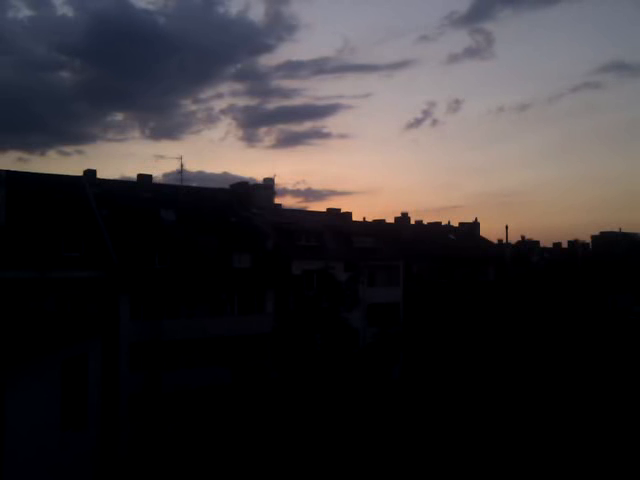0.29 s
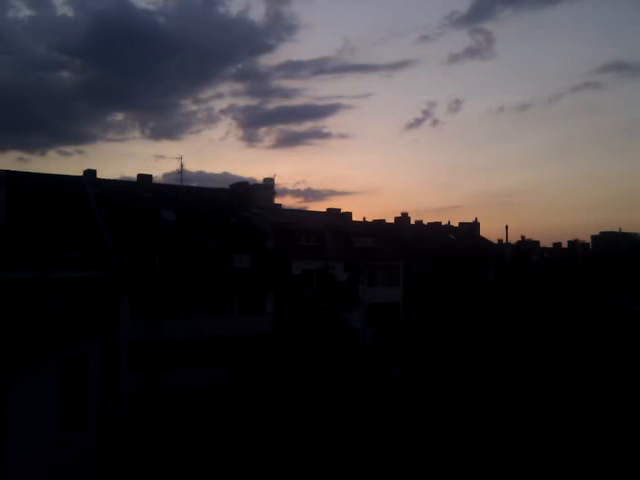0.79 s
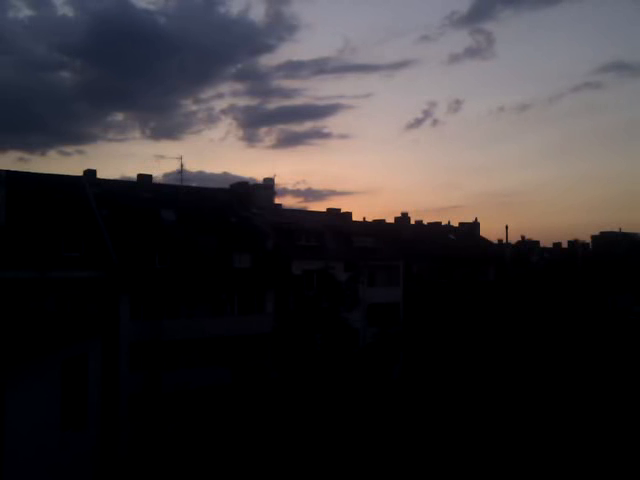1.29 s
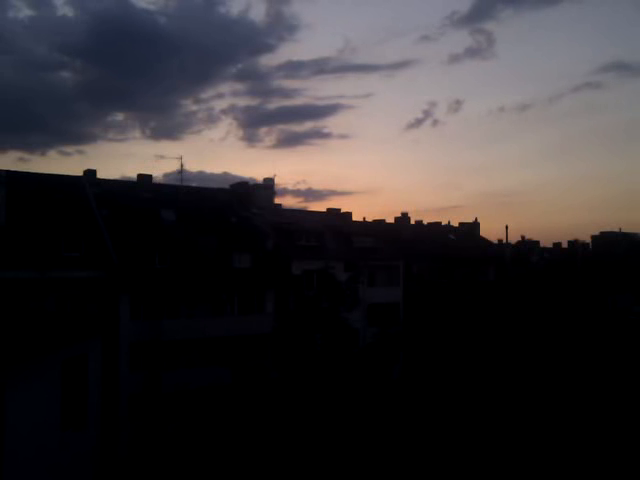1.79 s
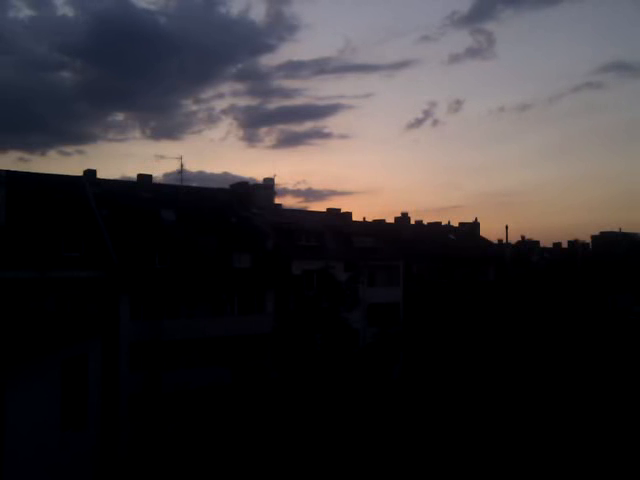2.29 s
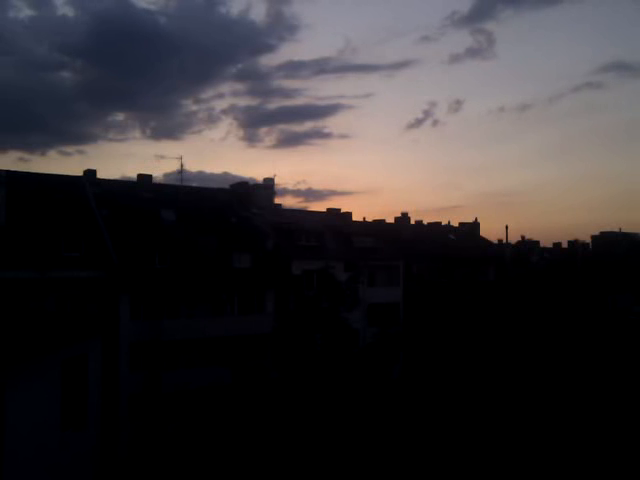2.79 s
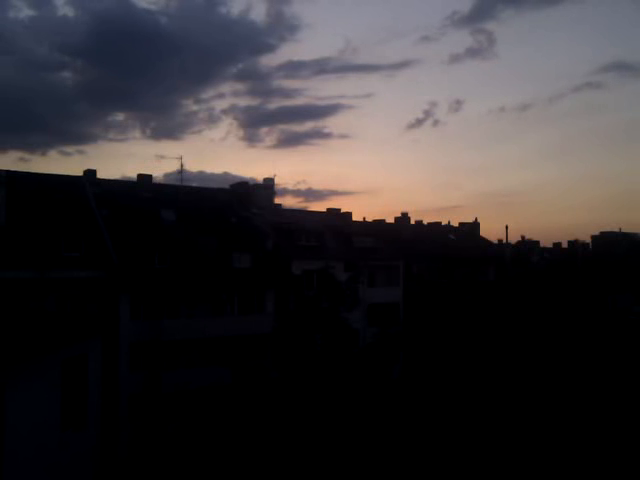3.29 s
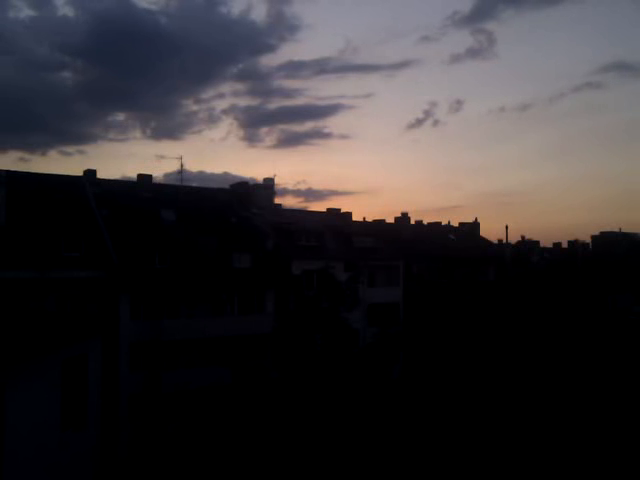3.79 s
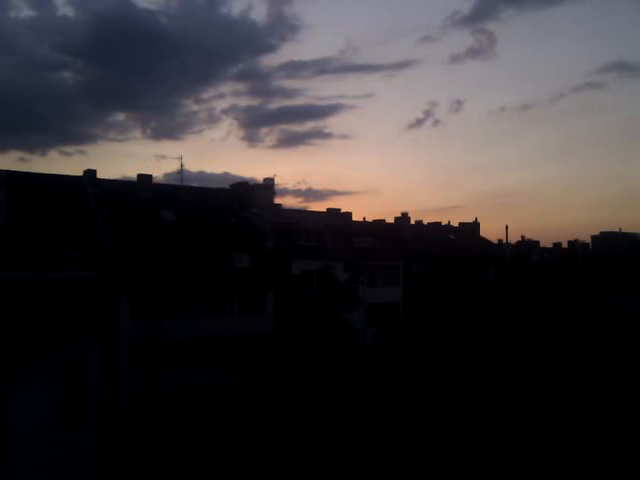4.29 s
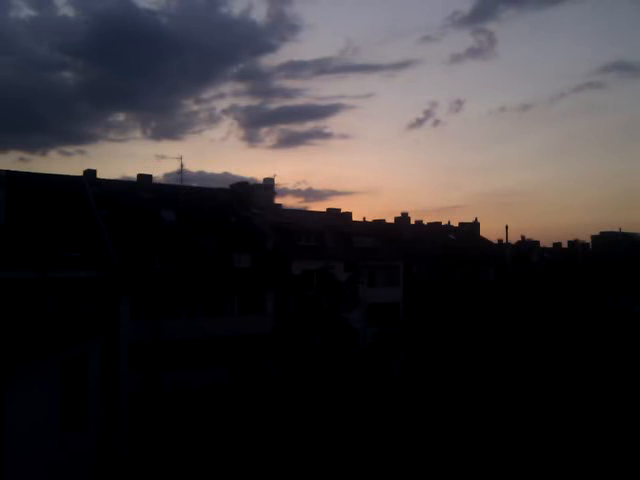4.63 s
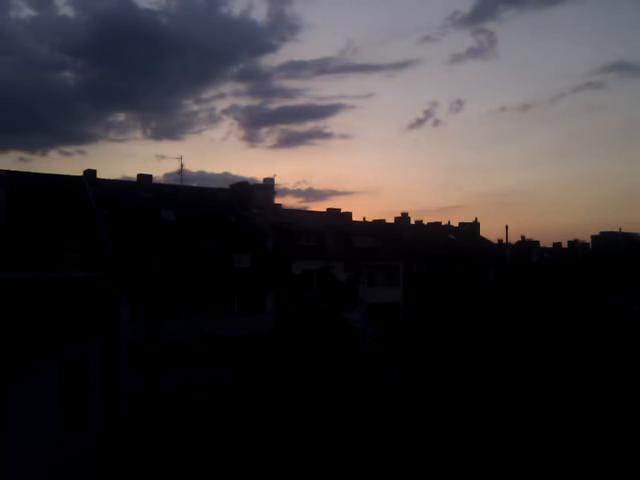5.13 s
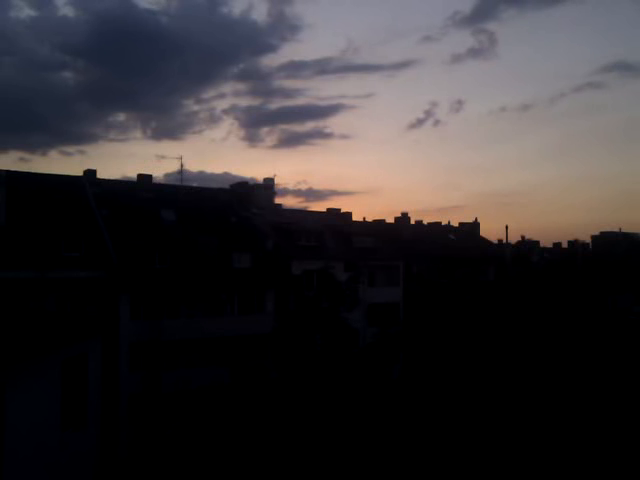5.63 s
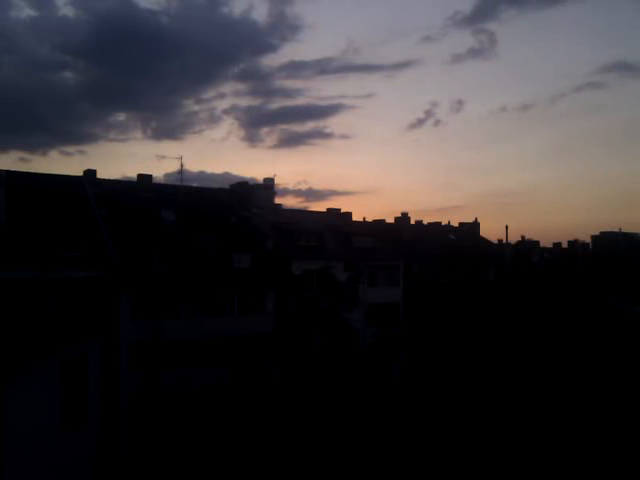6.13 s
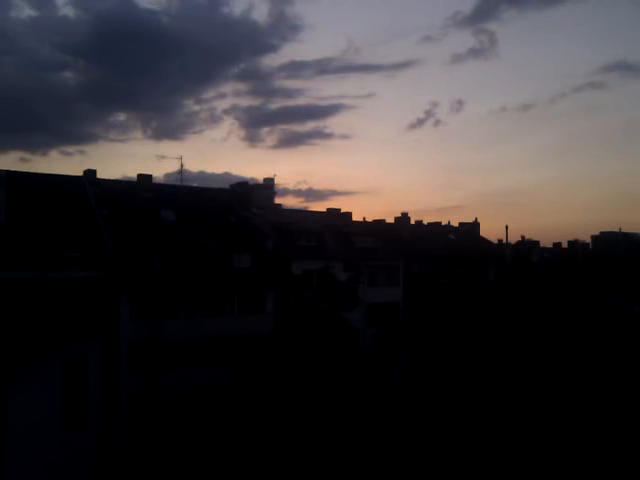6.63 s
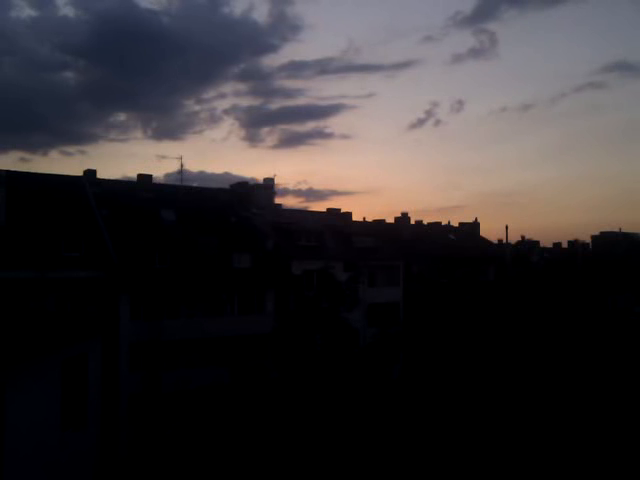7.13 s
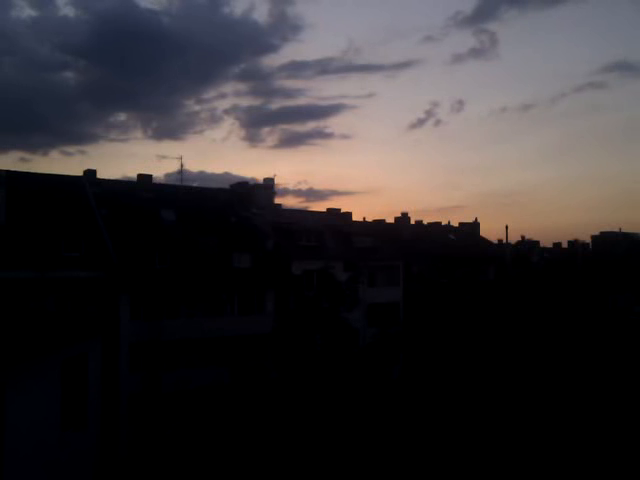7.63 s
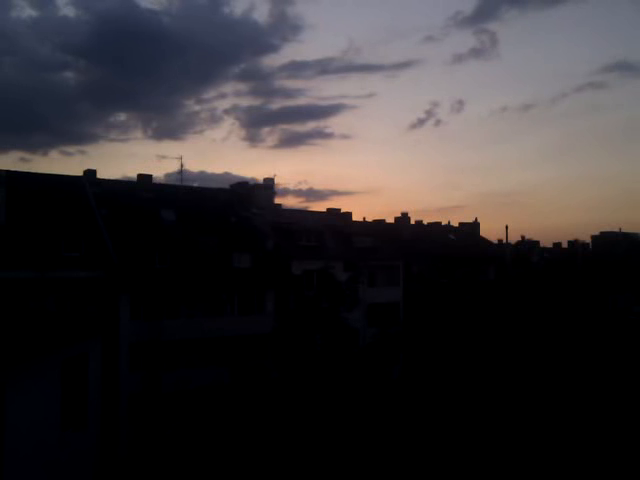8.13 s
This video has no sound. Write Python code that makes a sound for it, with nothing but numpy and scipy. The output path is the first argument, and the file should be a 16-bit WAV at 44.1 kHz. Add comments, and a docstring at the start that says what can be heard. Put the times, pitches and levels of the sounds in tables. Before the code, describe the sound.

A blackbird sings a short phrase of fluted notes and buzzy trills over city rooftops, mixed with dry twitters and thin swift screams. The swifts call faintly, then grow loud and shrill around the middle as the blackbird sings again, ending in quick chips. The screams then recede. Calls echo off the houses, and a low murmur of traffic and distant engines continues underneath, heard from a fixed outdoor position.

```python
"""Blackbird and swifts at dusk

A blackbird sings over the roofs: low fluted notes, buzzy trills and quick chips, its two-sided
syrinx often sounding two notes at once. Swifts scream overhead, near and far, among dry twitters.
House fronts throw the sound back. Underneath sit a city murmur, droning engines and one soft rustle."""
import sys
import numpy as np
from scipy import signal
from scipy.fft import rfft, irfft, next_fast_len
from scipy.io import wavfile
from scipy.ndimage import uniform_filter1d

SR = 44100
rng = np.random.default_rng(int(sys.argv[2]) if len(sys.argv) > 2 else 0)


def generate_wav(sig):
    """Save sig (samples, or channels by samples) to the path in sys.argv[1] as 16-bit PCM at SR."""
    pcm = np.round(np.clip(np.atleast_2d(sig).T, -1, 1) * 32767).astype(np.int16)
    wavfile.write(sys.argv[1], SR, pcm)


N = 369558

# The blackbird's smooth notes. Here and below, peak_at runs from 0 (a sound's start) to 1 (its end).
# start_s, length_s, opening_hz, middle_hz, closing_hz, level_db, peak_at
WHISTLES = [ (0.206, 0.1, 1930, 1737, 1718, -41, 0.1), (0.315, 0.044, 2215, 2130, 2160, -40, 0.5),
            (0.358, 0.033, 2130, 2173, 2160, -29.5, 0.5), (0.393, 0.044, 2227, 2257, 2240, -29.5, 0.2),
            (0.623, 0.054, 2467, 2380, 2260, -32, 0.4), (1.209, 0.07, 2900, 3280, 3520, -40, 0.66),
            (1.246, 0.028, 6760, 6950, 7120, -49, 0.8), (1.288, 0.0099, 3100, 4470, 5250, -38, 0.5),
            (1.296, 0.021, 5150, 5720, 5850, -43, 0.1), (1.393, 0.048, 3110, 3325, 3420, -41.5, 0.68),
            (1.403, 0.022, 6530, 6760, 6900, -49, 0.7), (1.458, 0.025, 3360, 5400, 5760, -48.5, 0),
            (4.405, 0.048, 2265, 2320, 2440, -43, 0.95), (4.443, 0.014, 2400, 2700, 3020, -40.5, 0.8),
            (4.493, 0.04, 2150, 2083, 2033, -42, 0.7), (4.859, 0.087, 3240, 2940, 2780, -33, 1),
            (4.954, 0.014, 1860, 2034, 2160, -41.5, 0.8), (4.967, 0.066, 2170, 2217, 2262, -32.5, 0.16),
            (5.184, 0.023, 1720, 1948, 2030, -41, 0.85), (5.199, 0.077, 2035, 1938, 1803, -33.5, 0.36),
            (5.655, 0.057, 2545, 2517, 2488, -35.5, 0.48), (5.71, 0.075, 2400, 2420, 2388, -28.5, 0.21),
            (5.797, 0.033, 2295, 2254, 2260, -32.5, 0.6), (5.833, 0.067, 2235, 2168, 2203, -32, 0.18),
            (6.180, 0.025, 4050, 3860, 3780, -36, 0.58), (6.192, 0.031, 7600, 6930, 3670, -33.5, 0.52),
            (6.205, 0.02, 3710, 3140, 2660, -38.5, 0), (6.697, 0.031, 4410, 5390, 7570, -42, 0.9),
            (6.717, 0.017, 2680, 3360, 4740, -46, 0.65), (6.734, 0.037, 4600, 5360, 5300, -48.5, 0.3),
            (6.788, .008, 5870, 6700, 7550, -44, 0.4), (6.957, 0.01, 7700, 6800, 6100, -33.5, 0.47),
            (6.965, 0.015, 6270, 5680, 5400, -38.5, 0.3), ]
# Its trilled notes:
# start_s, length_s, opening_hz, middle_hz, closing_hz, level_db, peak_at, beat_hz, swing_hz, pulsing_db
TRILLS = [ (0, 0.125, 2108, 2114, 2170, -51, 0, 58, 45, 3.5),
          (0.135, 0.08, 2453, 2405, 2395, -45.5, 0.6, 44, 430, 3.5),
          (0.497, 0.092, 2372, 2490, 2630, -44, 0.85, 48, 422, 1.5),
          (0.532, 0.09, 2242, 2255, 2253, -43, 0.66, 98, 130, 3),
          (0.593, 0.033, 2900, 2740, 2560, -38, 0.5, 53, 125.6, 3),
          (4.458, 0.035, 2316, 2270, 2230, -48, 0.2, 97, 326, 0),
          (4.637, 0.18, 2367, 2312, 2096, -39.5, 0.66, 87, 110, 1.5),
          (5.265, 0.24, 1842, 1790, 1856, -40, 0.11, 29.6, 45, 13),
          (5.491, 0.14, 1980, 2334, 2400, -34, 0.78, 61, 37.5, 4.5),
          (6.23, 0.072, 3565, 3900, 3440, -37.5, 0.53, 122, 380, 1.5), ]
# Its run of quick chips: time_s, level_db
CHIPS = [(6.397, -42), (6.421, -36), (6.445, -38), (6.470, -38.5), (6.494, -37), (6.517, -37.5),
         (6.541, -40), (6.563, -40)]
# The flick and drop of one chip: offset_s, pitch_hz, gain_db
CHIP_SHAPE = [(-.011, 6200, -12), (-.005, 6500, 0), (-.002, 6600, -1), (0, 7500, -2), (.002, 6000, -7),
              (.005, 4500, -18)]
# Swift screams; rasp runs from 0 (clean) to 1 (hoarse).
# start_s, length_s, scoop_s, opening_hz, middle_hz, closing_hz, level_db, peak_at, rasp
SCREAMS = [ (-.02, 0.052, 0.0038, 5300, 5380, 5420, -48.5, 0.4, 0.57),
           (0.027, 0.31, 0, 6200, 6660, 6230, -43, 0.42, 0.82),
           (0.194, 0.16, 0.0046, 5730, 5520, 5460, -43.5, 0.23, 0.96),
           (.338, 0.12, 0, 5290, 5020, 4650, -45.5, 0.05, 0.99),
           (1.542, 0.14, 0.0027, 5810, 6000, 6100, -57, 0.35, 0.5),
           (1.656, 0.32, 0, 6170, 6230, 6230, -56.5, 0.3, 0.5),
           (1.907, 0.19, 0.0039, 5890, 5950, 5950, -54, 0.4, 0.15),
           (2.155, 0.45, 0.0054, 5980, 6090, 5980, -54, 0.7, 0.54),
           (2.598, 0.31, 0.0061, 6040, 5920, 6100, -55, 0.6, 0.73),
           (2.787, .13, 0.031, 6030, 5920, 6080, -39.5, 0.32, 0.37),
           (2.841, 0.2, 0.031, 6020, 6120, 6190, -36, 0.54, 0.64),
           (2.931, 0.41, 0, 6200, 6130, 5790, -41, 0.24, 0.84),
           (3.533, .1, 0, 5820, 5940, 5930, -48.5, 0.76, 0.52),
           (3.737, 0.29, 0.015, 5960, 5870, 5980, -61, 0.3, 0.5),
           (4.006, 0.04, 0, 5500, 5540, 5630, -41, 0.44, 0.62),
           (4.037, 0.056, 0, 5680, 5770, 5860, -36, 0.6, 0.6),
           (4.08, 0.18, 0.00048, 5820, 5890, 5910, -36, 0.3, 0.77),
           (4.162, 0.069, 0.0044, 5940, 5940, 5850, -35, 0.55, 0.7),
           (4.23, 0.17, 0.009, 6550, 6400, 6170, -42.5, 0.87, 1),
           (4.556, 0.345, 0.0057, 5330, 6177, 6785, -23.5, 0.48, 0.23),
           (4.584, 0.26, 0.003, 5280, 6013, 6174, -22, 0.92, 0.12),
           (4.828, 0.095, 0.00038, 6250, 6250, 6200, -25.5, 0.8, 0.61),
           (4.903, 0.15, 0.005, 6680, 6710, 6740, -32, 0.15, 0.56),
           (5.021, 0.0777, 0.03, 6010, 5936, 5857, -18, 0.42, 0.24),
           (5.045, 0.046, 0, 6220, 6270, 6200, -29, 0.4, 0.3),
           (5.097, 0.029, 0.0024, 5900, 5934, 5870, -22.5, 0.5, 0.3),
           (5.127, 0.055, 0, 6010, 6114, 6090, -23.5, 0.01, 0.42),
           (5.162, 0.1, 0.038, 5660, 5876, 6025, -26.5, 0.78, 0.52),
           (6.056, 0.27, 0, 5030, 5470, 5670, -47, 0.8, 0.54),
           (6.544, 0.41, 0, 5980, 5980, 6030, -53.5, 0.23, 0.55),
           (6.501, 0.2, 0.0074, 5620, 5620, 5570, -63, 0.2, 0.6),
           (6.754, .14, 0.0029, 5420, 5390, 5170, -51.5, 0.7, 0.77),
           (6.983, 0.42, 0.0053, 5630, 5570, 5420, -60.5, 0, 0.57),
           (7.349, 0.24, 0.01, 4910, 5330, 5390, -56, 0.66, 0.9),
           (7.502, 0.52, 0, 5470, 5440, 5400, -63, 0, 0.4),
           (7.92, 0.29, 0, 5130, 5280, 5270, -63.5, 0.34, 0.5), ]
# The birds' dry rattles, before the slowing stretches them:
# start_s, length_s, ticks_per_s, opening_hz, closing_hz, tick_drop_hz, level_db, peak_at
RATTLES = [ (0.874, 0.016, 66, 6870, 6980, 1100, -33.5, 1), (0.9026, .212, 83, 6880, 6790, 1100, -29, 0.1),
           (0.903, 0.085, 93, 5450, 5350, 1050, -36, 0.4), (1.004, 0.0094, 83, 5050, 5050, 990, -40.5, 0.1),
           (1.111, 0.008, 83, 5200, 5150, 800, -45, 0), (0.338, .108, 75, 5300, 4440, 900, -36.5, 0.2),
           (4.238, .045, 53, 6100, 6090, 700, -30.5, 0.9), (4.304, 0.034, 54, 6000, 5820, 804, -25, 0.6),
           (4.35, 0.016, 127, 5220, 5360, 512, -34.5, 0.5), (4.414, 0.017, 140, 5270, 5150, 600, -42.5, .3),
           ]
# Overtones of a bird's voice: pitch_multiple, gain_db
OVERTONES = [(3, -23)]
# Slaps off the house fronts: delay_s, gain_db
WALL_ECHOES = [(.003, -22.5), (.007, -10), (.012, -15.5), (.027, -23.5)]
# Time the street's tail takes to fall 60 dB: frequency_hz, decay_s
STREET_DECAY = [(1500, 1.9), (2500, 1.77), (4000, 1.9), (6000, 1.32), (8000, 2.4)]
# Tone of that tail: frequency_hz, gain_db
STREET_EQ = [(1500, -6), (2500, -7.5), (4000, -8), (6000, -9.5), (8000, -10.5)]
# Tone of the city bed: frequency_hz, gain_db
CITY_EQ = [(15, -34), (25, -6.5), (33, -6), (91, -6), (165, 0), (196, -5), (287, -1.5), (316, -6),
           (356, -4.5), (783, -14.5), (1230, -17.5), (1720, -23.5), (3980, -28), (6130, -24), (7600, -35),
           (9880, -76), (16700, -120)]
# Stereo width of the bed: frequency_hz, side_to_mid_db
CITY_WIDTH = [(30, -43.5), (100, -35.5), (300, -25.5), (700, -23.5), (2000, -16), (7000, -8)]
# Swell of the tyre roar, taken relative to its median: time_s, roar_db
TRAFFIC_SWELL = [(0.0, -47), (0.02, -51), (0.25, -48.5), (1.4, -49), (1.631, -51), (3.08, -47), (3.66, -50),
                 (4.551, -49), (5.16, -45), (5.97, -48), (6.51, -47), (8.38, -49.5)]
# Engines and motors in the streets: start_s, length_s, opening_hz, closing_hz, level_db
ENGINES = [ (0, 1.64, 280, 280, -57), (0, 2, 169.4, 168, -57), (0.998, 1.13, 71.7, 79.5, -59),
           (1.804, 1.36, 1397, 1400, -70.5), (2.198, 1.2, 262, 276.6, -60.5),
           (2.2, 1.72, 171.6, 164.8, -58.5), (3.4, 1.4, 41.8, 45.9, -59.5),
           (4.398, 0.84, 95.5, 101.2, -56.5), (4.751, 0.65, 69.6, 75.2, -55.5),
           (4.98, 0.48, 51.9, 55.5, -52.5), (5.45, 0.64, 77, 85.4, -53.5), (6.08, 0.37, 67.1, 70.6, -53.5),
           (5.8, 1.52, 477.5, 472, -64.5), (6.1, 0.86, 88.8, 97.5, -56.5), (6.55, 0.67, 149, 156.6, -56.5),
           (6.95, 0.55, 89.4, 91.7, -54.5), (7.53, 0.57, 96, 105, -59.5), (6.896, 1.26, 1243, 1256, -68), ]
# Tone of the rustle: frequency_hz, gain_db
RUSTLE_EQ = [(200, -23), (600, -1), (1300, 0), (2800, -5.5), (4200, -20), (8000, -35)]


def blackbird(trill_rasp=0.48):
    """Fluted notes, trills and chips; the wider a trill swings, the raspier it gets."""
    song = np.zeros(N)
    for start, length, opening, middle, closing, db, peak_at in WHISTLES:
        u = progress(length)
        level = db + swell(u, peak_at, rise_db=14, fall_db=7)
        add(song, start, syrinx(arc(u, opening, middle, closing), level))
    for start, length, opening, middle, closing, db, peak_at, beat_hz, swing_hz, pulsing_db in TRILLS:
        u = progress(length)
        pitch = arc(u, opening, middle, closing)
        level = db + swell(u, peak_at, rise_db=5.5, fall_db=4.5)
        rasp = trill_rasp * min(swing_hz / 400, 1)
        add(song, start, syrinx(pitch, level, beat_hz, swing_hz, pulsing_db, rasp))
    offsets, chip_hz, chip_db = np.transpose(CHIP_SHAPE)
    t = np.arange(offsets[0], offsets[-1], 1 / SR)
    for time, db in CHIPS:
        chip = syrinx(np.interp(t, offsets, chip_hz), db + np.interp(t, offsets, chip_db))
        add(song, time + offsets[0], chip)
    return song


def syrinx(pitch_hz, level_db, beat_hz=0, swing_hz=0, pulsing_db=0, rasp=0, fray_hz=300,
           uneven=0.02, jitter=0.0044, shimmer_db=1.33, edge_s=0.0019):
    """One side of a bird's syrinx: a near sine whose trills swing the pitch and pulse the level."""
    n = len(pitch_hz)
    t = np.arange(n) / SR
    hz = uniform_filter1d(pitch_hz, size=60) * (1 + jitter * wander(n, 190))
    beat = phase_of(beat_hz * (1 + uneven * wander(n, 44)))
    hz += swing_hz * (np.sin(beat) + 0.39 * np.sin(2 * beat))  # a lopsided swing
    pulsing = unit_rms(amp(-pulsing_db * np.cos(beat - 1)))  # loudest late in the fall of each beat
    dwell_db = 3 * min(swing_hz / 500, 1)  # wide swings ring at their turning points
    pulsing *= unit_rms(amp(-dwell_db * np.cos(2 * beat)))
    gate = np.sin(np.pi / 2 * np.clip(np.minimum(t, t[-1] - t) / edge_s, 0, 1)) ** 2
    phase = phase_of(hz)
    tone = np.sin(phase) + sum(amp(db) * np.sin(k * phase) * (k * hz < SR / 2) for k, db in OVERTONES)
    frayed = fray(n, fray_hz) * np.sin(phase) + fray(n, fray_hz) * np.cos(phase)
    voice = np.sqrt(2 * (1 - rasp ** 2)) * tone + rasp * frayed
    return voice * gate * pulsing * amp(level_db + shimmer_db * wander(n, 140))


def fray(n, core_hz, skirt_hz=1260, skirt_db=-20):
    """Uneven vibration frays a tone into a narrow band with a faint, wide skirt of hiss."""
    skirt = amp(skirt_db)
    return (wander(n, core_hz) + skirt * wander(n, skirt_hz)) / np.sqrt(1 + skirt ** 2)


def swifts(scoop_hz=1412, scoop_db=8.5, waver_hz=22):
    """Shrill screams that scoop up, arch, buzz and fray; the clean ones hold a wavering line."""
    calls = np.zeros(N)
    for start, length, scoop_s, opening, middle, closing, db, peak_at, rasp in SCREAMS:
        u = progress(length)
        scoop = np.maximum(1 - u * length / max(scoop_s, 1 / SR), 0)
        pitch = arc(u, opening, middle, closing) - scoop_hz * scoop + waver_hz * wander(len(u), 35)
        level = db + swell(u, peak_at, rise_db=14, fall_db=7, curve=1.92) - scoop_db * scoop
        # the hoarser the scream, the slower and wider its buzz
        buzz_hz = 490 * (130 / 490) ** rasp
        swing_hz = np.interp(rasp, [0, 1], [13, 130])
        fray_hz = np.interp(rasp, [0, 1], [220, 486])
        scream = syrinx(pitch, level, buzz_hz, swing_hz, pulsing_db=rasp, rasp=rasp, fray_hz=fray_hz,
                        uneven=0.25, jitter=0.0016, shimmer_db=0.44, edge_s=0.0022)
        add(calls, start, scream)
    return calls


def rattles(tick_s=0.011, slowing_per_s=0.36):
    """Dry twitters: slowing trains of ticks, each diving in pitch and then levelling out."""
    out, u = np.zeros(N), progress(tick_s)
    tick_db = swell(u, peak_at=0.54, rise_db=12.5, fall_db=12.5)
    for start, length, rate, opening, closing, drop_hz, db, peak_at in RATTLES:
        for t in np.arange(0, length, 1 / rate):
            hz = opening + (closing - opening) * t / length
            pitch = arc(u, hz + drop_hz / 2, hz - 0.17 * drop_hz, hz - drop_hz / 2)
            level = db + swell(t / length, peak_at, rise_db=3, fall_db=6) + tick_db
            add(out, start + t * (1 + slowing_per_s * t), syrinx(pitch, level, rasp=0.4))
    return out


def walls(sound):
    """Single slaps off the nearest house fronts."""
    out = np.zeros(N)
    for delay, db in WALL_ECHOES:
        add(out, delay, amp(db) * sound)
    return out


def roofs(sound, delay_s=0.007, decay_s=0.13, gain_db=-9):
    """A quick, dense scatter off the nearest roofs that blurs every note."""
    t = np.arange(SR // 4) / SR
    taps = scatter(len(t), taps_per_s=3000) * amp(-60 * t / decay_s)
    out = np.zeros(N)
    add(out, delay_s, amp(gain_db) * signal.oaconvolve(sound, taps / np.linalg.norm(taps)))
    return out


def doppler(sound, spread_hz=70):
    """A flying swift nears some walls and leaves others, so its echoes spread around its pitch."""
    shift_hz = spread_hz * wander(N, 30)
    return np.sqrt(2) * np.cos(phase_of(shift_hz)) * sound


def street(sound, build_s=0.0025):
    """A long tail of echoes from roofs and yards, each band dying at its own speed."""
    hz, t, bands = signal.stft(unit_rms(scatter(2 * SR, taps_per_s=2000)), SR, nperseg=256)
    decay_s = curve_at(STREET_DECAY, hz)[:, None]
    unit_energy = np.sqrt(np.log(1e6) / (decay_s * SR))
    envelope = amp(-60 * t / decay_s) * (1 - np.exp(-t / build_s))
    bands *= unit_energy * envelope * amp(curve_at(STREET_EQ, hz))[:, None]
    tail = signal.istft(bands, SR, nperseg=256)[1]
    return signal.fftconvolve(sound, tail)[:N]


def drifting_street(sound, drift_hz=30, drift_rad=1.11):
    """Moving air shifts the echo between two sets of paths, blurring the tail; gives mid and side."""
    turn = drift_rad * wander(N, drift_hz)
    first, second = street(sound), street(sound)
    return np.cos(turn) * first + np.sin(turn) * second, np.cos(turn) * second - np.sin(turn) * first


def city(level_db=-47, roar_hz=1500):
    """Distant traffic: a low roar swells slowly under a steady hiss, almost alike in both ears."""
    hz = np.fft.rfftfreq(2048, 1 / SR)
    t = np.arange(N // 512 + 5) * 512 / SR
    mid_re, mid_im, side_re, side_im, grain = rng.standard_normal((len(t), len(hz), 5)).T
    grain = uniform_filter1d(grain, size=5, axis=0)
    ripple_db = unit_rms(uniform_filter1d(grain, size=16, axis=1))  # soft patches in pitch and time
    times, roar_db = np.transpose(TRAFFIC_SWELL)
    surge_db = np.interp(t, times, roar_db - np.median(roar_db)) / (1 + (hz[:, None] / roar_hz) ** 4)
    colour = amp(curve_at(CITY_EQ, hz)[:, None] + surge_db + ripple_db)
    mid = mid_re + 1j * mid_im
    side = (side_re + 1j * side_im) * amp(curve_at(CITY_WIDTH, hz))[:, None]
    bed = signal.istft(np.array([mid + side, mid - side]) * colour, nperseg=2048, noverlap=1536)[1]
    return amp(level_db) * unit_rms(bed[:, :N])


def engines(waver=0.012, flutter_db=3, scattered=0.72, fading_hz=14):
    """Each distant engine is a wavering tone that glides with its speed and fades between the houses."""
    out = np.zeros(N)
    for start, length, opening, closing, db in ENGINES:
        u = progress(length)
        n = len(u)
        hz = (opening + (closing - opening) * u) * (1 + waver * wander(n, 13))
        envelope = amp(db + flutter_db * wander(n, 6.1)) * signal.windows.tukey(n, 0.3)
        fading = wander(n, fading_hz) + 1j * wander(n, fading_hz)
        paths = np.sqrt(2 * (1 - scattered ** 2)) + scattered * fading
        add(out, start, envelope * (paths * np.exp(1j * phase_of(hz))).real)
    return out


def rustle(start_s=2.33, length_s=0.2, level_db=-54):
    """One soft rustle: a brief, flickering puff of midrange noise."""
    out, u = np.zeros(N), progress(length_s)
    n = len(u)
    colour = amp(curve_at(RUSTLE_EQ, np.fft.rfftfreq(n, 1 / SR)))
    noise = unit_rms(irfft(rfft(rng.standard_normal(n)) * colour, n))
    envelope = np.sin(np.pi * u) * amp(level_db + 2.1 * wander(n, 49))
    add(out, start_s, noise * envelope)
    return out


def progress(length_s):
    """A ramp from 0 to 1 across a sound."""
    return np.linspace(0, 1, max(round(length_s * SR), 64))


def arc(u, opening, middle, closing):
    """A pitch bend: one smooth bow from the opening through the middle to the close."""
    return opening + (closing - opening) * u + (2 * middle - opening - closing) * 2 * u * (1 - u)


def swell(u, peak_at, rise_db, fall_db, curve=0.92):
    """An envelope in dB: up to 0 at the peak, then down."""
    top = np.clip(peak_at, 0.02, 0.98)
    before = np.maximum(1 - u / top, 0)
    after = np.maximum((u - top) / (1 - top), 0)
    return -rise_db * before ** curve - fall_db * after ** curve


def wander(n, rate_hz):
    """Smooth random modulation of unit size, moving at up to about rate_hz."""
    size = next_fast_len(n + 2048, True)
    lowpass = np.exp(-(np.fft.rfftfreq(size, 1 / SR) / rate_hz) ** 2)
    return irfft(rfft(rng.standard_normal(size)) * unit_rms(lowpass), size)[:n]


def scatter(n, taps_per_s):
    """Echo taps at random times, with random polarity."""
    return rng.choice([-1., 1.], n) * (rng.random(n) < taps_per_s / SR)


def curve_at(points, hz):
    """A curve's value at hz, on a log-frequency axis."""
    frequencies, values = np.transpose(points)
    return np.interp(np.log(hz + 1), np.log(frequencies + 1), values)


def phase_of(hz):
    return 2 * np.pi * np.cumsum(hz) / SR


def amp(db):
    return 10 ** (np.asarray(db) / 20)


def unit_rms(x):
    return x / np.sqrt(np.mean(x ** 2) + 1e-20)


def add(mix, start_s, sound):
    """Lays a sound into the mix, trimming any overhang."""
    start = round(start_s * SR)
    sound = sound[max(-start, 0):]
    part = mix[max(start, 0):][:len(sound)]
    part += sound[:len(part)]


def scene(sky_delay_s=0.034, swift_send_db=4, width_db=-30):
    """Birds up front, their echoes behind, the city underneath."""
    song, screams = blackbird() + rattles(), swifts()
    front = song + walls(song) + roofs(song) + screams
    send = song.copy()
    add(send, sky_delay_s, amp(swift_send_db) * doppler(screams))  # from high up, echoes come later
    echoes, side = drifting_street(send)
    spread = amp(width_db) * np.array([side, -side])
    return front + echoes + spread + city() + engines() + rustle()


def record(dry, cutoff_hz=7650, dc_offset=-0.0163):
    """A steep high cut and a small constant offset on the whole mix."""
    lowpass = signal.firwin(301, cutoff_hz, window=("kaiser", 8), fs=SR)
    return signal.oaconvolve(dry, lowpass[None], "same") + dc_offset


dry = scene()
out = record(dry)
generate_wav(out)
```